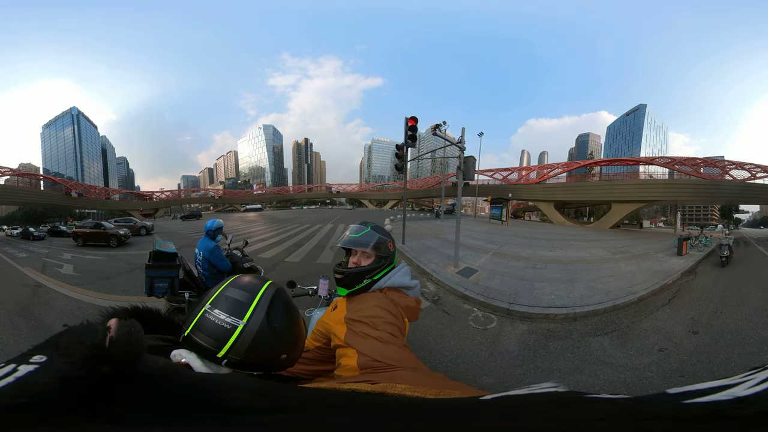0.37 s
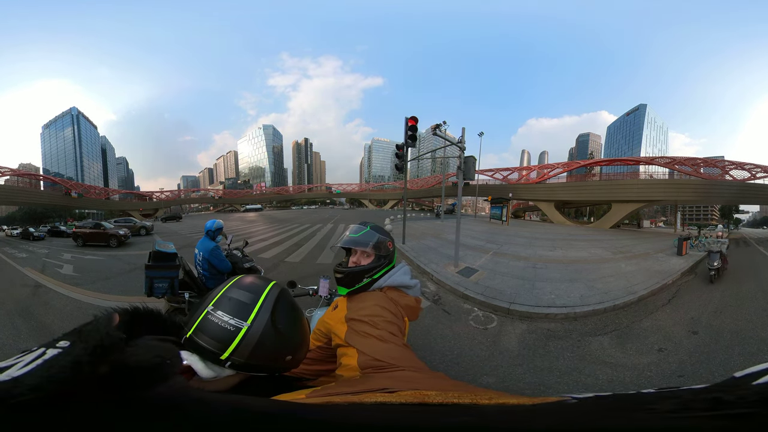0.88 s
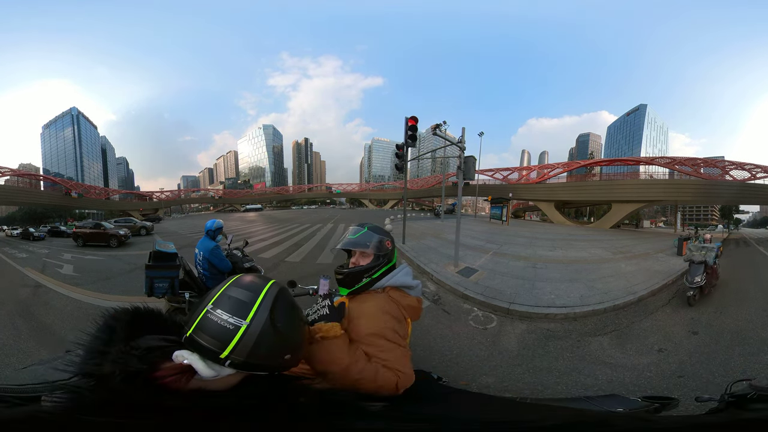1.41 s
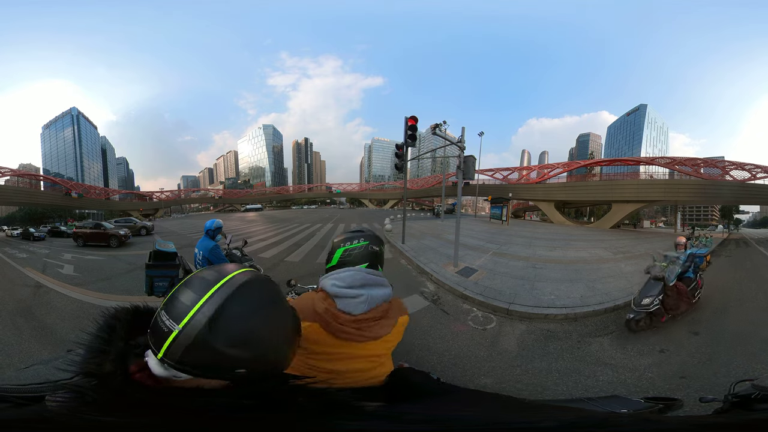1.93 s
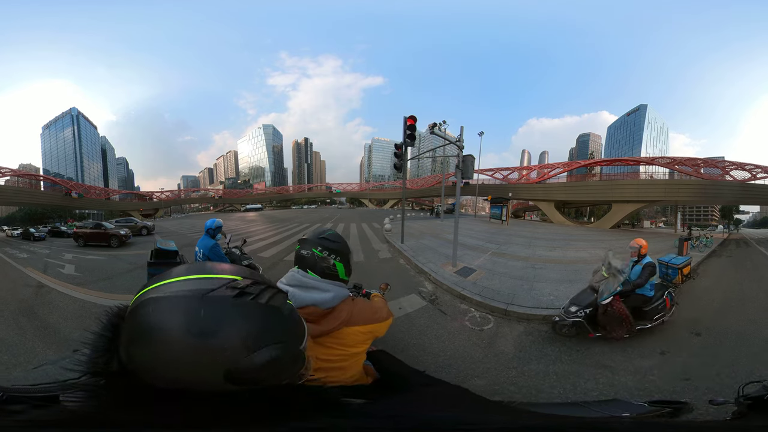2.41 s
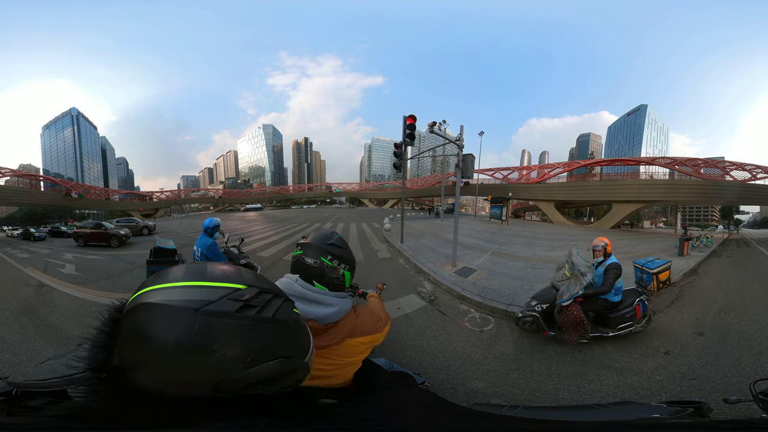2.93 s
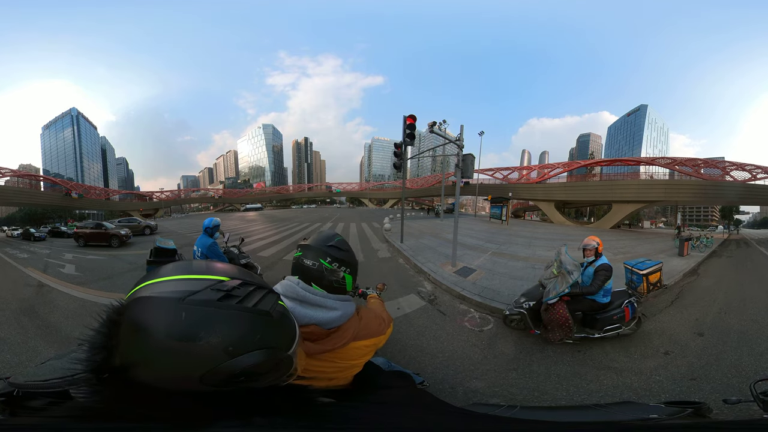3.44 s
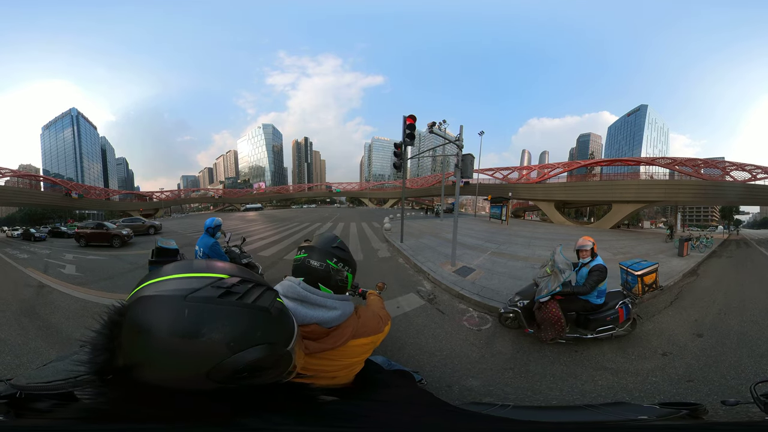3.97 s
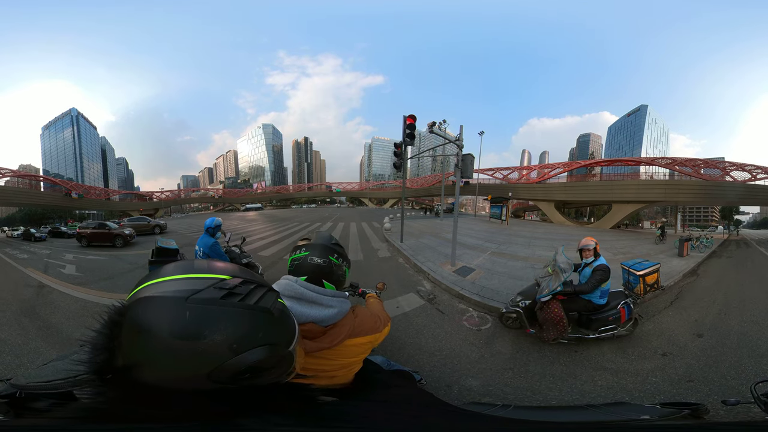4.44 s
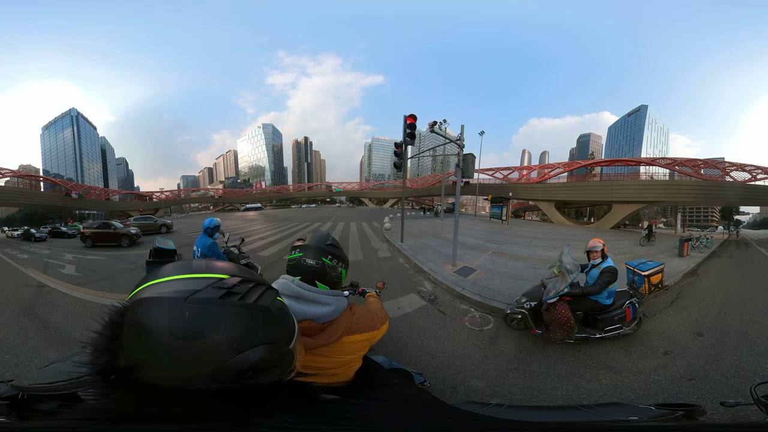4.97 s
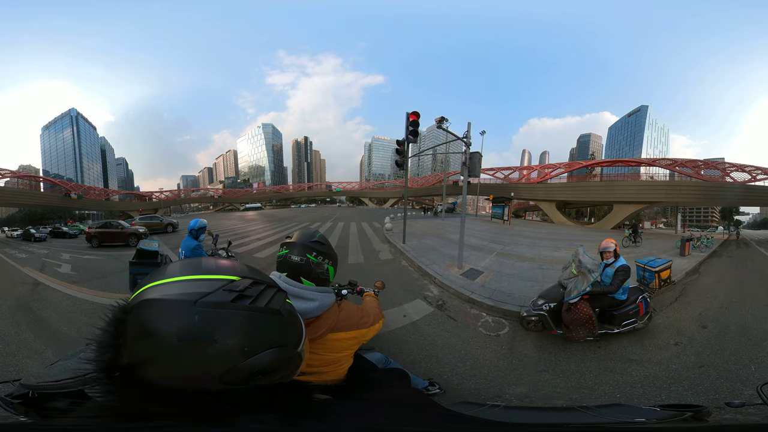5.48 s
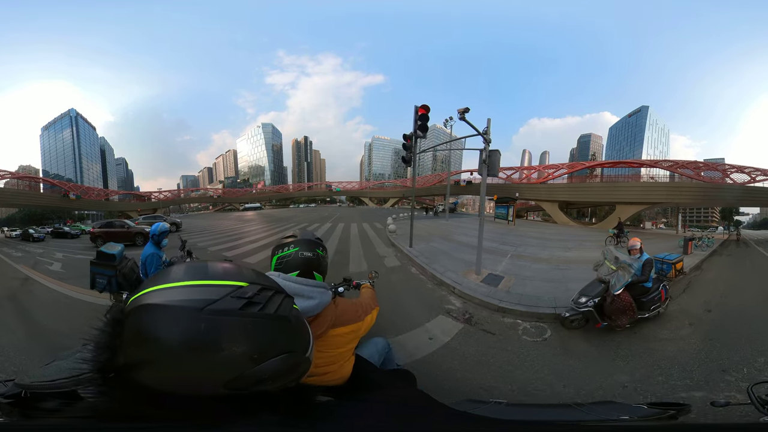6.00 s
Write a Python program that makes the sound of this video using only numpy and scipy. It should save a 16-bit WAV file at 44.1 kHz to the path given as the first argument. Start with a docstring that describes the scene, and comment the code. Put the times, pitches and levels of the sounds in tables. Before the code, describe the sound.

Lumpy two-cylinder motorcycle idle at a city junction, faint brake squeal early, cloth rustle and dry ticks, then throttle opens and the beat quickens.

```python
"""A two-cylinder motorcycle idles unevenly at a city junction, then the throttle opens and the beat evens out.
Each firing sends a blowdown pulse and a later scavenging pulse through the ringing modes of the exhaust pipe.
Shaped noise makes the gas turbulence, valve gear, traffic, ticks and jackets; a far brake sings on a sine line.
A loose part rattles along as a few decaying sines with a noise crack, and a gear hums under load. A small
microphone hears it all, and the treble ends near 8 kHz."""
import sys
import numpy as np
from scipy import signal
from scipy.fft import rfft, irfft, next_fast_len
from scipy.io import wavfile
from scipy.ndimage import uniform_filter1d, map_coordinates

SR = 44100
rng = np.random.default_rng(int(sys.argv[2]) if len(sys.argv) > 2 else 0)


def level_to_linear(level):
    """Convert decibel levels to linear amplitude factors, elementwise."""
    exponent = np.asarray(level, float) / 20
    return 10 ** exponent


def store_pcm(level_fs):
    """Save levels as 16-bit WAV."""
    pcm = np.round(np.clip(level_fs, -1, 1) * 32767).astype(np.int16)
    wavfile.write(sys.argv[1], SR, np.atleast_2d(pcm).T)


N = 269892

# the rider's throttle: (time [s], opening [0-1])
THROTTLE = [(4.8, 0), (4.95, 1)]


def unit(x):
    """Scaled to rms 1."""
    return x / np.sqrt(np.mean(x ** 2) + 1e-20)


def curves(rows):
    """One value per sample for each column after the time."""
    s, *cols = np.transpose(rows)
    return [np.interp(np.arange(N) / SR, s, c) for c in cols]


def opening_at(s):
    """Throttle opening at the times s."""
    return np.interp(s, *np.transpose(THROTTLE))


def wobble(rate):
    """A smooth random curve, rate knots a second."""
    knots = rng.standard_normal(int(N * rate / SR) + 4)
    return map_coordinates(knots, [np.arange(N) * rate / SR])


def filtered(x, response):
    """x times a complex response of frequency, with spare room for the tail."""
    m = next_fast_len(len(x) + SR // 2)
    return irfft(rfft(x, m) * response(np.fft.rfftfreq(m, 1 / SR)), m)[:len(x)]


def rush(spectrum, patchy_db):
    """Coloured noise of rms 1 with time-frequency patches of random gain."""
    z = signal.stft(rng.standard_normal(N + 512), nperseg=512)[2]
    field = uniform_filter1d(rng.standard_normal(z.shape), size=6, axis=0)
    field = uniform_filter1d(field, size=10, axis=1)
    x = signal.istft(z * level_to_linear(patchy_db * unit(field)), nperseg=512)[1][:N]
    # the colour falls away within an octave beyond either end
    ends = [(spectrum[0][0] / 2, -120), *spectrum, (spectrum[-1][0] * 2, -120)]
    f, db = np.transpose(ends)
    return unit(filtered(x, lambda hz: level_to_linear(np.interp(np.log(hz + 1), np.log(f), db))))


def train(s, size):
    """Impulses of 1 ms area times size, on a time line that starts one second early."""
    return np.bincount(np.round((s + 1) * SR).astype(int), size * SR / 1000, N + 2 * SR)


def excite(pulses, response):
    """A resonance or smoothing driven by a train, cut back to the scene's own time line."""
    return filtered(pulses, response)[SR:SR + N]


def firings():
    """Time, blowdown dB, scavenging time and dB of every firing: loping pairs at idle, an even run under load."""
    # idle beats, each led by the strong cylinder: (time [s], its scavenging [dB], blowdown of the
    # weak cylinder [dB], -60 where the next firing is strong too, so no weak one is placed)
    beats = [(-0.126, -10, -8), (0.021, -3.7, -8), (0.1675, -14.8, -9.8), (0.3147, -3.9, -9.1),
             (0.4716, -12.4, -8.6), (0.6283, -11.8, -4.8), (0.7884, -18.3, -7.7), (0.9412, -13.5, -2.4),
             (1.0866, -22.9, -7.2), (1.2328, -11.4, -2.9), (1.3852, -13.3, -12.9), (1.536, -15.6, -11.1),
             (1.6829, -1.5, -5.2), (1.8199, -4.4, -60), (1.8931, -2.8, -10.1), (2.0353, -3.3, -12.2),
             (2.1834, -4.4, -8.5), (2.3351, -12.7, -14.2), (2.4922, -1.5, -7.4), (2.6421, -2.8, -11.4),
             (2.7986, -4.9, -17.2), (2.9503, -14.2, -12.1), (3.0965, -13.9, -4.4), (3.2439, -20, -3.4),
             (3.3938, -13.6, -9.3), (3.5394, -12.8, -5.9), (3.6882, -15, -9.4), (3.836, -3.1, -15.4),
             (3.9816, -1, -10.4), (4.1269, -13.7, -5.4), (4.2775, -14.3, -8.6), (4.4326, -13.3, -11),
             (4.5832, -15.1, -10.5), (4.7337, -2.9, -60), (4.8079, -1.9, -60)]
    # beats in which the weak cylinder scavenges poorly: (start of the beat [s], loss [dB])
    stumbles = [(1.536, -10), (1.6829, -5.5), (1.8931, -9), (2.4922, -3.5), (3.836, -10)]
    # under load the speed hunts about its mean: (time [s], rate [firings per s])
    speed = [(4.8771, 15.38), (4.98, 18.19), (5.15, 17.27), (5.33, 19.18), (5.49, 17.49), (5.76, 18.69),
             (5.92, 18.01), (6.12, 19.89)]
    load_s = speed[0][0]

    s, sweep_db, weak_db = np.transpose(beats)
    beat = np.diff(s, append=load_s)
    fires = weak_db > -60
    loss_db = np.array([dict(stumbles).get(start, 0) for start, *_ in beats])
    # scavenging follows blowdown, later when it is fuller
    strong_delay_ms = 27.5 + 3.5 * level_to_linear(sweep_db)
    strong = [s, 0 * s, s + strong_delay_ms / 1000, sweep_db]
    # as shares of the beat: blowdown later when fuller, scavenging earlier after a full strong one
    weak_s = s + beat * (.458 + .055 * level_to_linear(weak_db))
    weak_sweep_s = s + beat * (.713 - .02 * level_to_linear(sweep_db))
    weak = np.array([weak_s, weak_db, weak_sweep_s, -1.1 + loss_db])

    # under load one firing falls at each whole count of the integrated rate
    t = np.arange(load_s, N / SR + .2, 1 / SR)
    rate = np.interp(t, *np.transpose(speed))
    count = np.arange(int(rate.sum() / SR) + 1)
    run = np.interp(count, np.cumsum(rate) / SR, t)
    sagging_db = -1.8 - .9 * (run - run[0])  # .9 dB per s
    loaded_sweep_s = run + .382 * np.gradient(run)  # share of the firing interval
    loaded = [run, sagging_db, loaded_sweep_s, -6.2 + 0 * run]

    rows = np.hstack([strong, weak[:, fires], loaded]).T
    uneven_db = .25
    rows[:, 1::2] += uneven_db * rng.standard_normal((len(rows), 2))
    return rows[np.argsort(rows[:, 0])].T


def pipe(pulses, column, slug_ms):
    """A slug of gas with a rounded front rings every pipe mode, in through the header and out through the silencer."""
    # exhaust pipe modes, signed relative strengths [ms of unit pressure]: (frequency [Hz], width [Hz],
    # blowdown at idle [ms], scavenging at idle [ms], blowdown when open [ms], scavenging when open [ms])
    pipe_modes = [(40.7, 15.0, 0.38, -0.49, -0.29, -0.35), (69.0, 37.0, -0.91, -1.25, -0.32, -0.15),
                  (106.3, 48.9, 0.28, -0.07, 1.35, 1.94), (129.9, 39.8, 5.47, 2.26, 1.93, 1.97),
                  (185.2, 66.7, 1.55, 1.59, 0.19, 0.9), (214.9, 44.3, -0.29, -1.42, 0.32, -3.37),
                  (238.5, 57.4, 0.27, 0.67, -0.12, -0.14), (322.0, 41.7, -1.29, -0.26, -0.3, 1.64)]

    def response(f):
        """Each mode acts twice, after the smoothing of the front."""
        modes = 0
        for mode in pipe_modes:
            hz, width_hz = mode[:2]
            resonance = 1j * f * width_hz / (hz ** 2 - f * f + 1j * f * width_hz)
            modes = modes + mode[column] * resonance ** 2
        return modes / (1 + 2j * np.pi * f * slug_ms / 1000) ** 2
    return excite(pulses, response)


def exhaust(s, blow_db, later, sweep_db):
    """Two pulses a firing and extra ones at idle; the open throttle shifts their balance over the pipe modes."""
    # extra exhaust pulses at idle, a few of them stray scavenging pulses: (time [s], relative level [dB])
    extra_pulses = [(0.14, -15), (0.6554, -13.5), (0.7613, -15), (0.9128, -14.5), (1.167, -13),
                    (1.5794, -11), (1.6552, -13.5), (1.7339, -13), (1.7735, -7.5), (2.0073, -11.5),
                    (2.5586, -14), (2.994, -14.5), (3.1629, -11), (3.291, -12.5), (3.3033, -14),
                    (3.4375, -15.5)]
    # the fainter follower of each idle scavenging pulse: (time [s], level relative to its pulse [dB])
    follower_level = [(0, -11.5), (2.9, -11.5), (3.4, -18)]
    extra_s, extra_db = np.transpose(extra_pulses)
    opening = opening_at(s)
    blow, sweep = level_to_linear(blow_db), level_to_linear(sweep_db)
    idle_sweep = sweep * (1 - opening)
    follower_db = np.interp(s, *np.transpose(follower_level))
    follower = train(later + .0054, level_to_linear(follower_db) * idle_sweep)
    idle_later_pulses = train(later, idle_sweep) + follower + train(extra_s, level_to_linear(extra_db))
    beat = pipe(train(s, blow * (1 - opening)), column=2, slug_ms=1.62)
    beat += pipe(idle_later_pulses, column=3, slug_ms=1.01)
    beat += pipe(train(s, blow * opening), column=4, slug_ms=.64)
    beat += pipe(train(later, sweep * opening), column=5, slug_ms=1.3)
    return level_to_linear(0.3) * beat


def valve_cover(s, blow_db):
    """The valve cover gives a brief ring near 555 Hz at each blowdown, harder under load."""
    def cover(f):
        """A broad resonance passed twice."""
        return (1j * f * 160 / (555 ** 2 - f * f + 1j * f * 160)) ** 2
    knocks = train(s + .003, level_to_linear(blow_db + 2.2 * opening_at(s)))
    return level_to_linear(-35.7) * excite(knocks, cover)


def exhaust_valve(s, blow_db):
    """The exhaust valve opens with a short dull thud: noise under a smoothed pulse."""
    knocks = train(s + .003, level_to_linear(blow_db + 1.9 * opening_at(s)))
    snap = unit(excite(knocks, lambda f: 1 / (1 + 1j * f / 110) ** 2))
    # (frequency [Hz], level [dB per Hz])
    colour = [(380, -12), (450, -2), (560, -0.5), (750, -4.5), (1100, -11.5)]
    return level_to_linear(-62.7) * snap * rush(colour, patchy_db=0.7)


def burning_lumps():
    """Uneven burning adds slow random lumps of low noise, weaker under load."""
    # colour of uneven burning: (frequency [Hz], relative level [dB per Hz])
    lump_colour = [(27, -27), (38, 0), (52, 0), (65, -3), (80, 1), (95, 0.5), (130, -9.5), (170, -15.5)]
    level_db = -36.8 - 10.5 * curves(THROTTLE)[0] + 1.5 * wobble(12)
    return level_to_linear(level_db) * rush(lump_colour, patchy_db=1.5)


def gas_burble(s, blow_db, later, sweep_db):
    """Gas flow swells after each pulse and carries turbulent noise in the pipe, calmer under load."""
    # colour of turbulent gas: (frequency [Hz], relative level [dB per Hz])
    burble_colour = [(110, -2.5), (170, -3), (230, 2.5), (280, 0.5), (330, -2), (400, -14), (480, -30)]
    pulses = train(s, level_to_linear(blow_db)) + train(later, level_to_linear(sweep_db))
    flow = unit(excite(pulses, lambda f: 1 / (1 + 1j * f / 25) ** 2))
    turbulence = unit((1 + 0.35 * flow) * rush(burble_colour, patchy_db=1.5))
    return level_to_linear(-40 - 9.5 * curves(THROTTLE)[0]) * turbulence


def valve_gear(s, blow_db):
    """The valve gear clacks just after each blowdown, harder under load: bright noise under a short envelope."""
    # colour of the clack: (frequency [Hz], relative level [dB per Hz])
    clack_colour = [(400, -4.5), (700, 4.5), (1500, -5.5), (3000, -7), (5000, -14.5), (7500, -21.5)]
    hit_db = blow_db + 6 * opening_at(s) + 1.3 * rng.standard_normal(len(s))
    knocks = train(s + .0055, level_to_linear(hit_db))
    clack = unit(excite(knocks, lambda f: 1 / (1 + 1j * f / 45) / (1 + 1j * f / 300)))
    return level_to_linear(-65) * clack * rush(clack_colour, patchy_db=4.5)


def traffic():
    """Distant traffic: a steady coloured roar whose level wavers."""
    # colour of the roar: (frequency [Hz], relative level [dB per Hz])
    roar_colour = [(210, -31), (350, -0.5), (369, -7), (558, -10.5), (596, -11.5), (737, -11), (888, -15.5),
                   (962, -14), (1510, -22), (2900, -30), (3230, -36), (5220, -40), (8420, -49),
                   (10900, -85), (18500, -120)]
    # mean level of the roar: (time [s], level [dB])
    roar_level = [(0, -45.5), (1.4, -45.5), (2.6, -46), (4.1, -46), (4.7, -45.2), (5.1, -49), (6.12, -49)]
    return level_to_linear(curves(roar_level)[0] + .9 * wobble(7.6)) * rush(roar_colour, patchy_db=0.9)


def hum(hz, width_hz):
    """Noise in a narrow band: a wavering line of rms 1."""
    return unit(filtered(rng.standard_normal(N), lambda f: 1 / (1 + ((f - hz) / width_hz) ** 2)))


def motor_hums():
    """Two motors in the traffic hum on wavering lines, the higher one with its octave."""
    # (time [s], low hum level [dB], high hum level [dB])
    hum_levels = [(0, -53.5, -67.5), (1.4, -57.5, -60.5), (1.9, -53.5, -56.5), (3, -60, -56),
                  (3.6, -61.5, -56), (4.5, -60.5, -61.5), (5.4, -69.5, -62), (6.1, -61, -70.5)]
    low_db, high_db = curves(hum_levels)
    high = hum(934, 9) + level_to_linear(-15) * hum(1868, 9)
    return level_to_linear(low_db) * hum(738, 10) + level_to_linear(high_db) * high


def squeal():
    """A far brake sings on a thin, slightly unsteady line, then lets go."""
    # two squeaks of the brake: (time [s], pitch [Hz], rms level [dB])
    squeaks = [(0, 6840, -71), (.13, 6900, -69), (.17, 6900, -84), (.29, 6820, -80), (.39, 6870, -69),
               (.44, 6975, -58), (.5, 6990, -64), (.68, 6980, -82)]
    hz, db = curves(squeaks)
    on = np.clip((squeaks[-1][0] - np.arange(N) / SR) / .03, 0, 1)
    cycles = np.cumsum(hz + 6 * wobble(26)) / SR
    return on * np.sqrt(2) * level_to_linear(db + 1.5 * wobble(25)) * np.sin(2 * np.pi * cycles)


def jackets():
    """Jackets rub steadily as grainy noise, swell with each stroke, and add a duller padding noise."""
    # strokes of cloth: (peak time [s], level [dB], rise [s per 10 dB], fall [s per 10 dB])
    rustles = [(1.665, -59, .2, .015), (2.02, -61, .09, .04), (2.11, -62, .02, .03),
               (2.65, -58.5, .04, .06), (2.95, -66, .06, .02), (3.04, -63, .03, .05), (3.84, -63, .08, .02),
               (4.02, -46, .032, .016), (4.09, -59, .04, .03), (4.19, -60, .03, .02), (4.7, -63, .02, .05),
               (5.83, -60, .015, .02)]
    # colour of the cloth: (frequency [Hz], relative level [dB per Hz])
    cloth_colour = [(1200, -21.5), (2000, -8.5), (2800, 0), (4000, -4), (6000, -6.5), (7500, -13.5),
                    (9000, -11.5)]
    # the dull side of a stroke: (frequency [Hz], relative level [dB per Hz])
    padding_colour = [(350, -8), (520, 3), (1000, -4), (1700, -9), (2600, -22)]
    t = np.arange(N) / SR
    strokes = np.zeros(N)
    for s, db, rise, fall in rustles:
        strokes += level_to_linear(db - 10 * np.maximum((s - t) / rise, (t - s) / fall))
    # the rubbing rises by 4 dB when the throttle opens
    rubbing = level_to_linear(-68 + 4 * curves(THROTTLE)[0] + 1.5 * wobble(9))
    grain = level_to_linear(2.5 * wobble(150) + 0.69 * wobble(20))
    cloth = (rubbing + strokes) * unit(grain * rush(cloth_colour, patchy_db=3.3))
    # the square root lets the padding swing half as wide in dB as the cloth
    padding = level_to_linear(-23.5) * np.sqrt(strokes) * rush(padding_colour, patchy_db=2.5)
    return cloth + padding


def ticks():
    """Dry ticks of buckles and gloves: short bursts of noise in a broad resonance."""
    # (time [s], relative level [dB])
    tick_hits = [(1.4335, -52.5), (1.5522, -49), (1.6694, -49), (1.7843, -51), (1.8831, -46.5),
                 (2.807, -45.5), (3.253, -45.5), (4.018, -42), (4.174, -54)]
    out, t = np.zeros(N + SR), np.arange(SR // 20) / SR
    for s, db in tick_hits:
        burst = level_to_linear(db + 6.5 - 60 * t / 0.012) * rng.standard_normal(len(t))
        out[round(s * SR):][:len(t)] += burst
    return filtered(out[:N], lambda f: 1j * f * 4500 / (5600 ** 2 - f * f + 1j * f * 4500))


def rattle(fired_s, blow_db):
    """Every knock rings the loose part's modes at new strengths, with a short crack of noise."""
    # hardest knocks of the loose part: (time [s], relative level [dB])
    hard_knocks = [(3.1043, -48), (3.5487, -45.5), (3.8442, -44.5), (4.135, -38), (4.3916, -44),
                   (4.547, -47.5), (4.594, -46.5), (4.741, -40), (4.8146, -43.5), (4.848, -46),
                   (4.884, -41), (4.9455, -50), (5.0003, -45), (5.2254, -50), (5.3899, -45), (5.443, -47),
                   (5.4986, -45), (5.5557, -46), (5.829, -47.5), (5.994, -44)]
    # its modes: (frequency [Hz], relative level [dB], decay by 60 dB [s])
    part_modes = [(2740, -0.5, 0.0086), (3110, 0, 0.027), (3430, -10, 0.049), (4600, -13, 0.0097)]
    # from 3.8 s on, each full blowdown jogs the part 7 ms later
    jogs = fired_s[(fired_s > 3.8) & (blow_db > -4)] + .007
    knocks = list(hard_knocks) + [(s, rng.normal(-60, 3)) for s in jogs]
    out, t = np.zeros(N + SR), np.arange(SR // 10) / SR
    for s, db in knocks:
        ring = np.zeros(len(t))
        for hz, level, t60 in part_modes:
            ring += level_to_linear(level + rng.normal(0, 2.0) - 60 * t / t60) * np.sin(2 * np.pi * hz * t)
        crack = level_to_linear(rng.normal(-6.5, 3.5) - 60 * t / .012) * rng.standard_normal(len(t))
        onset = 1 - np.exp(-t / .0018)
        out[round(s * SR):][:len(t)] += level_to_linear(db + 3.5) * (ring + crack) * onset
    return filtered(out[:N], lambda f: (1j * f / (1800 + 1j * f)) ** 2)


def gear_hum(s):
    """Under load a gear hums at 17 teeth per firing, so its pitch rides on the engine speed."""
    fired = np.interp(np.arange(N) / SR, s, np.arange(len(s)))
    fired = uniform_filter1d(fired, size=SR // 20)  # evens the count over 50 ms
    teeth = 17
    return -level_to_linear(-48.2 + wobble(6)) * curves(THROTTLE)[0] * np.sin(2 * np.pi * teeth * fired)


def scene():
    """Everything at one microphone."""
    s, blow_db, later, sweep_db = firings()
    engine = exhaust(s, blow_db, later, sweep_db)
    engine += valve_cover(s, blow_db) + exhaust_valve(s, blow_db) + burning_lumps()
    engine += gas_burble(s, blow_db, later, sweep_db) + valve_gear(s, blow_db) + gear_hum(s)
    street = traffic() + motor_hums() + squeal()
    near = jackets() + ticks() + rattle(s, blow_db)
    return (engine + street + near)[None]


def top_cut(x):
    """Nothing passes above the cut-off."""
    return signal.sosfilt(signal.butter(12, 8570, fs=SR, output="sos"), x)


def record(dry):
    """The small microphone rounds off the highest peaks, and the treble ends steeply above 7 kHz."""
    rounded = dry[0] / (1 + np.abs(dry[0] / .27) ** 4.5) ** (1 / 4.5)
    heard = filtered(rounded, lambda f: 1 / np.sqrt(1 + (f / 7400) ** 24))
    return top_cut(heard[None])


dry = scene()
out = record(dry)
store_pcm(out)
```